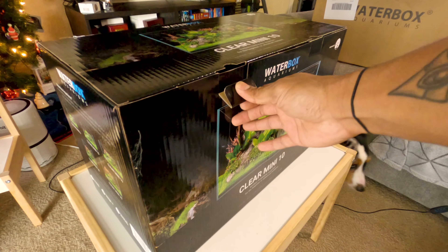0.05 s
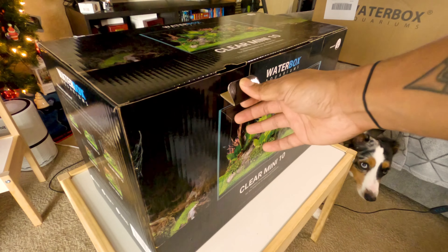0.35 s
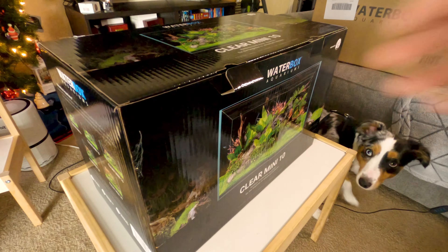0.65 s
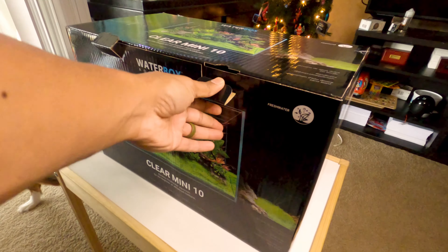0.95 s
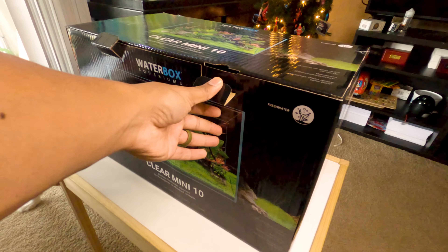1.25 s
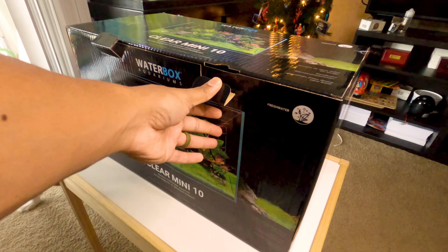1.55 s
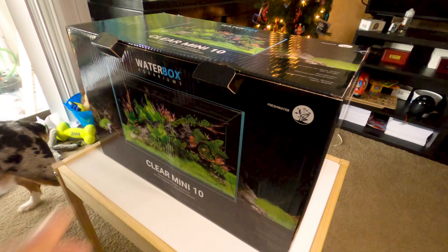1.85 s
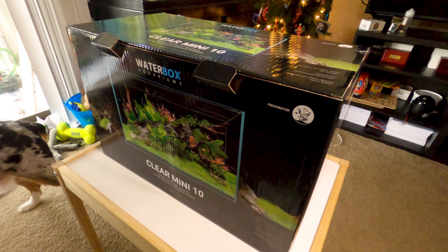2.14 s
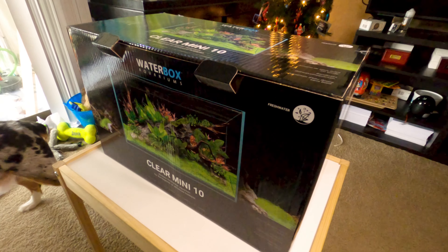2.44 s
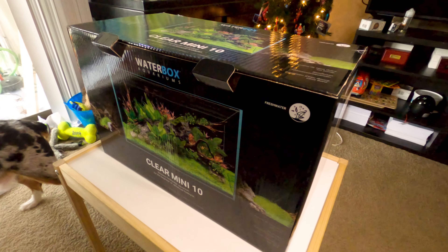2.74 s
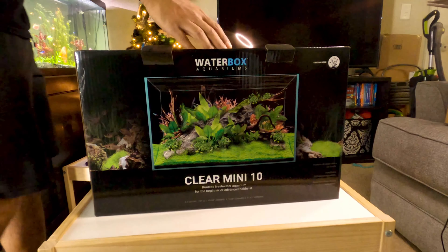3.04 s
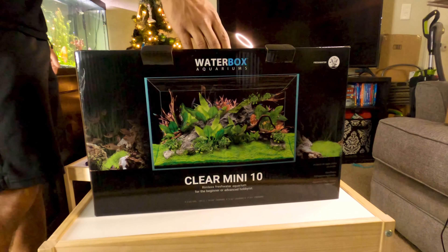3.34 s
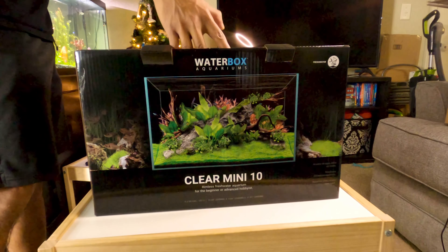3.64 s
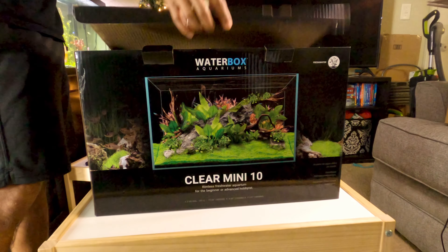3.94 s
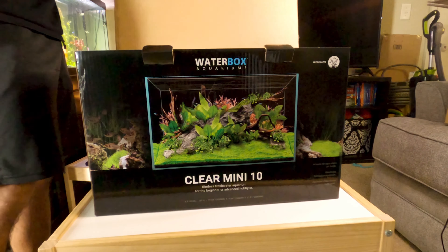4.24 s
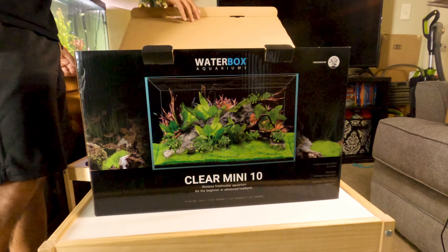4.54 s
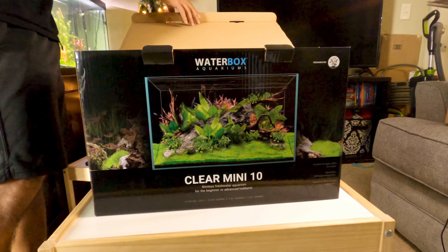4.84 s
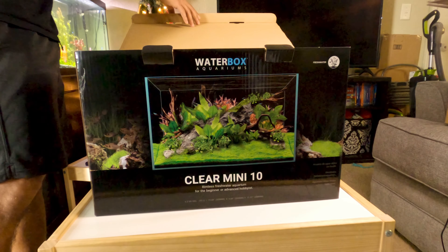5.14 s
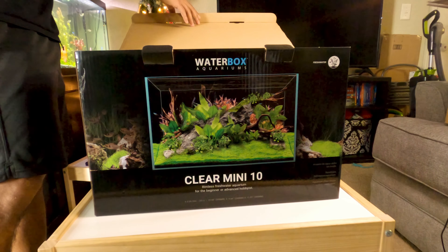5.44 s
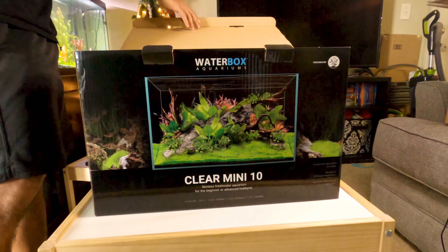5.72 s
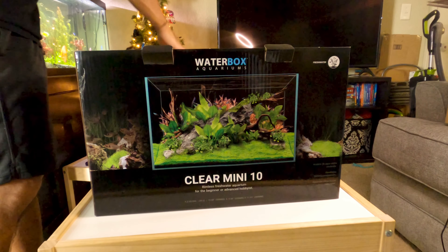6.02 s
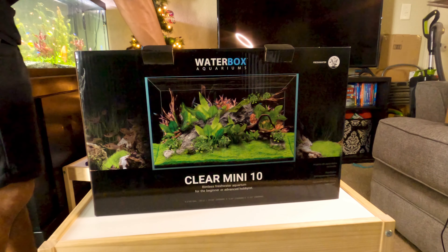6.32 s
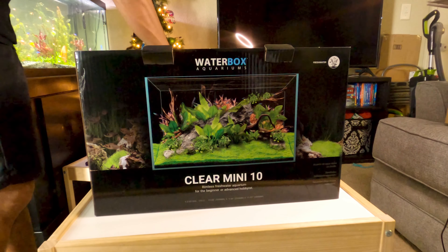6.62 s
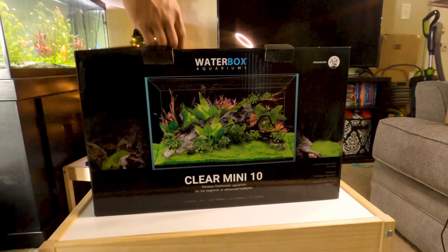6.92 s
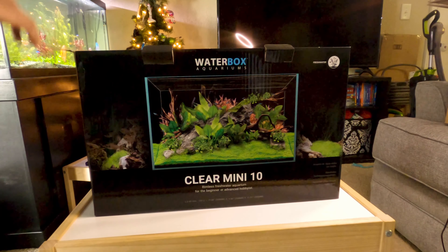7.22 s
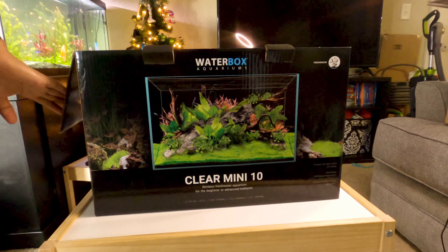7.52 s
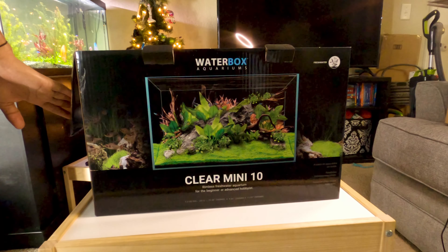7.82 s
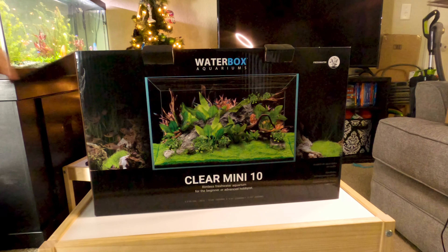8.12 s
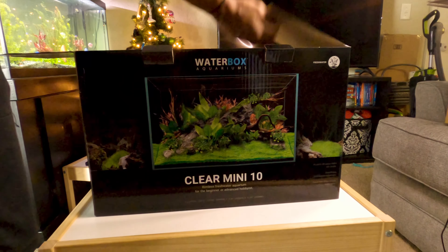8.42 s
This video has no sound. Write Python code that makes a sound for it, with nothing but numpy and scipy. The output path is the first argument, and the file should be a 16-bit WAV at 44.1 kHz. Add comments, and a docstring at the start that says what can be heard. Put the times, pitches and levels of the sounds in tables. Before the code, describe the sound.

A large cardboard box is opened close to the microphone in a room with little echo, over the faint, steady low hum of an aquarium pump and ventilation. It begins with a hollow knock and short scrape, followed by faint ticks and clothing rustle. At about 0.9 seconds a tab drags out with crackling snaps and a loud, boomy knock. Smaller taps come at 1.8 and 2.6 seconds, then another sharp scrape and loud knock at 2.9. Hands brush and tap the board lightly. From 3.8 to 4.4 seconds the lid scrapes free, with a snap and several deep panel thumps, trailing off in soft sliding. Only the hum remains from about 4.8 to 5.9. Clothes then rustle quietly, and from 6.7 to 7.5 flaps brush, click and bump softly. A last rustle and two gentle thumps come around 8.5 seconds.

```python
"""Opening a big cardboard box

A large box is opened close by, on a low table in a carpeted living room. Locking tabs drag out of
their slots and the lid scrapes free, in many tiny slips. Panels knock and boom, creases snap, hands
brush the flaps and clothes rustle. Aquarium equipment and ventilation hum steadily underneath."""
import sys
import numpy as np
from scipy import signal
from scipy.fft import rfft, irfft
from scipy.io import wavfile
from scipy.ndimage import uniform_filter1d

SR = 44100
rng = np.random.default_rng(int(sys.argv[2]) if len(sys.argv) > 2 else 0)


def master(y):
    """Save y as 16-bit WAV."""
    cut = np.clip(np.atleast_2d(y).T, -1, 1)
    pcm = np.round(cut * 32767)  # scale
    wavfile.write(sys.argv[1], SR, pcm.astype(np.int16))


N = 377934
TIME = np.arange(N) / SR

# Levels are set before mixing. A t60 is the time a sound takes to fade by 60 dB.
# A stroke grows by swell_db from start to end; its hiss_db and boom_db are added to its level_db.
# Board dragged hard against board: start_s, length_s, level_db, swell_db, hiss_db, boom_db
DRAGS = [ (0, 0.093, -34, -19.5, -19.5, 3.5), (0.837, 0.025, -47, 3, -6, -0.5),
         (.853, 0.088, -29, 6, -12, -13.5), (0.956, 0.019, -27.5, 8.5, -9.5, 3),
         (1.753, 0.067, -68, 0, 7, 6), (2.898, .035, -40, 0.5, -32, 8.5), (3.772, 0.11, -44.5, 0, -14.5, 6),
         (3.885, 0.014, -33.5, 4, -16, -11.5), (3.903, 0.11, -40.5, 9, -16.5, 11.5),
         (3.981, 0.037, -27, 5, -17, -14), (4.025, 0.027, -24.5, -5, -14.5, 5),
         (4.061, 0.028, -38.5, -10.5, -27, 21.5), (4.102, 0.086, -40.5, 0, -12.5, 10.5),
         (4.201, 0.084, -54, -12, -6.5, 2)]
# Hands and flaps sliding lightly: start_s, length_s, level_db, swell_db, hiss_db
BRUSHES = [ (3.06, 0.036, -51.5, 8, -15), (3.171, 0.17, -53.5, -3, -9), (3.375, .025, -55, -7, -21),
           (3.594, 0.019, -50, 4, -17), (3.614, 0.045, -46, 13, -9), (4.358, .02, -49.5, -4, -15),
           (4.367, 0.11, -52, 8, -13.5), (4.481, 0.078, -57, -5, 0.5), (6.703, 0.028, -53.5, 4, 0),
           (6.712, 0.11, -50.5, 2, 1.5), (7.028, .025, -55.5, -1, -1), (7.086, 0.024, -53.5, 0, 2),
           (7.112, 0.13, -53.5, 2.5, -6.5), (7.255, 0.19, -54.5, -4, -6.5), (7.393, 0.044, -49.5, -2, -18),
           (8.138, 0.083, -57.5, 11, -7.5)]
# Clothes, and feet on carpet: start_s, length_s, level_db, swell_db, hiss_db
RUSTLES = [ (0.08, 0.345, -57, -6, -10), (0.35, 0.59, -57.5, -6, -17.5), (2.032, 0.65, -59, -1, -23),
           (2.538, 0.052, -51.5, 0, -16), (5.88, 0.34, -63.5, -5.5, -7.5), (6.2, 0.4, -66, 2, -10.5),
           (7.485, 0.67, -59.5, -4, -12.5), (8.13, 0.27, -61.5, 8, -12.5), (8.414, 0.13, -49.5, 3, -16)]
# Blows on the box: start_s, level_db, sharpness_hz, boom_db (against the rest of the hit), focus_hz
KNOCKS = [ (.004, -21.5, 1500, 7, 750), (0.029, -25, 4000, 11, 1150), (.586, -47.5, 3000, 0, 444),
          (.947, -17.5, 1500, -10, 1040), (.951, -13.5, 2200, 2, 850), (.970, -27.5, 5950, 20, 1480),
          (.984, -22.5, 5000, 3, 733), (1.01, -29.5, 1110, -2, 759), (1.827, -31.5, 3380, 4.5, 810),
          (2.605, -35.5, 4000, 7, 800), (2.912, -21, 990, -2, 780), (2.926, -20, 2540, -7, 820),
          (2.929, -16.5, 900, 7, 450), (3.093, -46.5, 4020, -25, 800), (3.138, -47, 1780, -14, 845),
          (3.378, -45, 4440, -25, 803), (3.603, -43.5, 4800, -5.5, 990), (3.794, -44.5, 4000, -11, 980),
          (3.829, -33.5, 3370, -9, 436), (3.890, -33, 6040, -6, 730), (3.942, -39.5, 7000, -11, 700),
          (4.01, -42, 1390, 32, 1000), (4.049, -25.5, 1310, -7.5, 800), (4.175, -34, 1200, -2, 448),
          (4.369, -47.5, 2500, -6, 436), (4.473, -49.5, 2500, -11.5, 750), (8.461, -49, 500, -3, 400),
          (8.519, -47.5, 900, -5, 700)]
# Sharp clicks: creases snapping, plus faint ticks where the sound cuts:
# start_s, level_db, pitch_hz, ring_db (against the burst of noise)
CLICKS = [ (0.158, -53.5, 4060, 0), (0.237, -55, 4070, 0), (0.248, -45.5, 4030, 12),
          (0.266, -45.5, 4050, 4), (0.279, -48, 4100, 5), (0.287, -49, 4180, 7), (0.363, -57, 4170, 2),
          (0.375, -54.5, 4470, -5), (.464, -64, 5500, -11), (0.585, -57, 3780, 7), (0.866, -27.5, 2980, 11),
          (0.886, -28, 3450, -6), (0.92, -26, 3050, 12), (.926, -20, 2880, 3), (.984, -31, 9150, -7.5),
          (1.764, -55, 11500, -3), (1.784, -53.5, 11200, -3), (1.827, -46, 2600, 14),
          (2.576, -55.5, 5600, -5), (2.607, -41, 3120, 13), (2.832, -54.5, 1870, -0.5),
          (2.926, -31.5, 2480, 2.5), (4.042, -33, 4700, -16), (4.185, -44, 7100, -4),
          (6.710, -52, 2954, -7), (7.104, -47, 1686, 1.5), (7.113, -48.5, 6000, 18), (7.407, -43, 3060, -3),
          (7.414, -47, 1380, 8.5), (8.376, -62.5, 4000, -14)]
# Narrow-pitched rasps: sliding edges, and one faint, sustained rub near 1.5 kHz:
# start_s, length_s, pitch_hz, width_hz, level_db
RASPS = [(.01, .12, 1208, 130, -47), (0.854, .019, 3100, 900, -40), (.856, .018, 1130, 293, -29.5),
         (0.914, .045, 2950, 700, -29.5), (0.931, 0.017, 1285, 500, -27), (0.857, .13, 1880, 198, -38.5),
         (0.976, .053, 745, 202, -29), (2.2, 0.4, 1523, 129, -67.5), (2.635, .083, 6000, 2000, -73.5),
         (2.910, 0.033, 807, 300, -28.5), (3.198, 0.17, 772, 90, -59.5), (3.63, 0.066, 948, 150, -51),
         (3.993, 0.0564, 1954, 81, -30.5), (4.04, 0.019, 900, 250, -29), (4.223, 0.48, 4000, 1000, -67.5),
         (4.383, 0.1, 1710, 600, -60), (7.086, 0.056, 1595, 600, -52.5)]
# Whole panels flexing: start_s, level_db, pitch_hz, t60_s
THUMPS = [(.953, -15.5, 122.5, .2), (2.928, -17, 316, 0.043), (4.012, -12, 65.3, 0.095),
          (4.047, -14, 71.6, 0.045), (4.068, -16.5, 81.5, 0.12), (4.158, -24.5, 65, 0.11),
          (4.358, -21.5, 45, 0.11), (7.059, -36.5, 199, 0.18), (7.26, -26.5, 32.8, 0.4),
          (8.449, -36, 201, 0.7), (8.511, -28, 209, 0.17)]
# The box's modes, the tones it naturally rings at: pitch_hz, level_db, t60_s
BOX_MODES = [(77.8, -7, 0.23), (114.4, 4.5, 0.05), (199.4, 6.5, 0.037), (392, 0.5, 0.05), (474, 3.5, 0.027),
             (630, -5, 0.04), (783, 3, 0.038), (1029.4, 3, 0.032), (1253, -22, 0.015), (1440, 2.5, 0.024),
             (1880, -15, 0.018), (2210, 4.5, 0.01), (3000, -5, 0.017), (3040, -9, 0.027),
             (3650, -11, 0.015)]

# The tone colour of each kind of noise: frequency_hz, gain_db
DRAG_COLOUR = [(120, -18.5), (250, 4), (350, 1), (560, -0.5), (780, 1.5), (1100, 1), (1400, -3), (2100, -6),
               (3200, -8), (4500, -15.5), (9200, -21.5), (15500, -42.5)]
BRUSH_COLOUR = [(250, -7), (500, 8.5), (850, 2.5), (1400, 8.5), (2100, 3.5), (3600, -1), (5500, -13),
                (9000, -19), (11000, -27.5), (15500, -35.5)]
RUSTLE_COLOUR = [(250, -20), (500, 1.5), (900, 2.5), (1500, 4), (2300, -9), (4000, -17), (8000, -24.5),
                 (15000, -53)]
CRACK_COLOUR = [(150, -23), (400, 2), (1000, -2.5), (3000, -3), (5000, -12), (9000, -12), (15500, -28)]
CLICK_COLOUR = [(500, -12.5), (1400, 1.5), (3500, 13.5), (6000, 10), (9500, 3.5), (15500, -27)]
AIR_COLOUR = [(12, -25.5), (20, 1), (45, -3.5), (76, -8.5), (123, -7.5), (170, -18), (205, -17), (254, -10),
              (307, -19), (434, -29), (599, -32), (871, -38), (1370, -37), (6480, -59.5), (12000, -78),
              (15600, -122), (22000, -120)]
# Motor and mains tones: pitch_hz, level_db, waver_share (0 is steady)
HUM_TONES = [(29, -41.5, 0.24), (119.7, -51, 0.77), (177.4, -61, .5), (194, -64.5, 0.8), (239.3, -59.5, .3),
             (256.9, -47.5, 0), (362.7, -68, 0), (476.5, -74.5, 0.7)]
# How long the room echoes: frequency_hz, t60_s
ROOM_T60 = [(100, 0.23), (400, 0.37), (1000, 0.31), (3000, .29), (8000, 0.31), (15000, 0.29)]
# How much scattered sound differs between left and right: frequency_hz, gain_db
STEREO_WIDTH = [(30, -13.5), (100, -36), (400, -14), (1000, -8), (2500, -5.5), (6000, -1), (15000, -1.5)]
# Moments when the stereo sound narrows, just after the loudest blows: start_s, depth_db, hold_s
NARROWINGS = [(.85, 52, 1.1), (2.85, 68, 0.63), (3.698, 18.5, 0.92)]
# The bass narrows most: frequency_hz, depth_share
NARROW_SHARE = [(300, 1), (700, 0.82), (1600, 0.66), (4000, 0.43), (8000, .27), (13000, .1)]

PANEL_BELOW_HZ = 300  # in modes below this, whole panels and the air inside move


def drags(attack_s=0.0018, release_t60=0.043, boom_t60=0.22):
    """Tabs and lid pull through tight slots: coarse slips that also shake panels and ring the board."""
    force = slips(per_second=2400, spread_db=3.5, patchy_db=1.0, catch_hz=160)
    boom, ring = (signal.fftconvolve(force, response)[:N] for response in box_responses())
    boom = normalise_band(cut(boom, 54, "highpass"), (60, 300))
    boom *= stroke_loudness(DRAGS, attack_s, boom_t60, offset_column=5)
    ring = normalise_band(ring, (350, 4000)) * stroke_loudness(DRAGS, attack_s, release_t60)
    scrape = rub(force, DRAGS, attack_s, release_t60, DRAG_COLOUR, band_hz=(500, 4000), hiss_hz=4830)
    return undb(-2) * scrape + undb(-5) * boom + undb(-12) * ring


def knocks(crack_t60=0.017, focus_db=8, focus_octaves=0.95, give_s=0.00031, onset_s=0.01):
    """A blow crunches the board and favours the modes near its focus; softer contact sounds duller."""
    out = np.zeros(N)
    boom = normalise_onset(box_responses()[0], onset_s)
    t = TIME[:len(boom)]
    hz, mode_db, t60 = np.transpose([mode for mode in BOX_MODES if mode[0] >= PANEL_BELOW_HZ])
    modes = np.sin(2 * np.pi * hz[:, None] * t) * fade(t, 0.99 * t60[:, None])
    for start, db, sharpness_hz, boom_db, focus_hz in KNOCKS:
        nearness = np.exp(-(np.log2(hz / focus_hz) / focus_octaves) ** 2)
        ring = (rng.choice([-1, 1], len(hz)) * undb(mode_db + focus_db * nearness)) @ modes
        crack = colour(rng.standard_normal(len(t)), CRACK_COLOUR) * fade(t, crack_t60)
        hit = normalise_onset(ring, onset_s) + normalise_onset(crack, onset_s)
        hit *= 1 - np.exp(-t / give_s)  # the board gives a little before it answers
        hit = cut(hit, sharpness_hz, "lowpass")
        hit = normalise_onset(hit, onset_s) + undb(boom_db) * boom
        add(out, start, undb(db) * normalise_onset(hit, onset_s))
    return out


def thumps():
    """A large panel swings slowly back and forth, pushing air."""
    out, t = np.zeros(N), TIME[:SR // 2]
    for start, db, hz, t60 in THUMPS:
        add(out, start, undb(db) * np.sin(2 * np.pi * hz * t) * fade(t, t60))
    return out


def rasps(sag_share=0.035):
    """Uneven chatter around one slowly sinking pitch, like that of a sliding edge."""
    out = np.zeros(N)
    for start, length, hz, width_hz, db in RASPS:
        size = max(int(length * SR), SR // 200)
        noise = rng.standard_normal(SR) + 1j * rng.standard_normal(SR)
        chatter = cut(noise, width_hz / 2, "lowpass")[-size:]
        pitch_hz = hz * (1 + sag_share * np.linspace(.5, -.5, size))
        rasp = np.real(chatter * np.exp(2j * np.pi * np.cumsum(pitch_hz) / SR))
        add(out, start, undb(db) * rasp / np.std(rasp) * signal.windows.tukey(size, .5))
    return out


def clicks(t60=0.012, band_ratio=1.145, attack_s=0.00099):
    """A dry burst of noise with a short ring, as when a stiff crease gives way."""
    out, t = np.zeros(N), TIME[:SR // 16]
    for start, db, hz, ring_db in CLICKS:
        noise = rng.standard_normal((2, len(t)))
        burst = colour(noise[0], CLICK_COLOUR) * fade(t, t60)
        ring = cut(noise[1] * fade(t, t60), [hz / band_ratio, hz * band_ratio], "bandpass")
        click = burst / np.std(burst) + undb(ring_db) * ring / np.std(ring)
        click *= 1 - np.exp(-t / attack_s)
        add(out, start, undb(db) * normalise_onset(click, onset_s=0.004))
    return out


def brushes():
    """Skin and loose flaps glide over the board with fine, dense friction."""
    force = slips(per_second=3400, spread_db=1.3, patchy_db=1.8, catch_hz=62)
    return undb(-6) * rub(force, BRUSHES, attack_s=0.004, release_t60=0.25, tone=BRUSH_COLOUR,
                          band_hz=(890, 5000), hiss_hz=5540)


def rustles():
    """Cloth and carpet rub with so many slips that they sound smooth and dull."""
    force = slips(per_second=17000, spread_db=2.5, patchy_db=1.5, catch_hz=76)
    return undb(-5.5) * rub(force, RUSTLES, attack_s=0.018, release_t60=0.19, tone=RUSTLE_COLOUR,
                            band_hz=(875, 3000), hiss_hz=3880)


def pump_and_fan(waver_hz=7, air_db=-64.5, flicker_db=0.4, left_db=0.3):
    """Pump and fan tones waver over a low rush of air, a little to the left."""
    hum = 0
    for hz, db, waver_share in HUM_TONES:
        waver = 1 + waver_share * (wander(waver_hz) + 1j * wander(waver_hz))  # in level and phase
        hum += np.sqrt(2) * undb(db) * np.real(waver * np.exp(2j * np.pi * hz * TIME))
    rushes = (colour(noise, AIR_COLOUR) for noise in rng.standard_normal((2, N)))
    mid, side = (undb(air_db) * normalise_band(rush, (530, 6000)) for rush in rushes)
    air = mid * undb(flicker_db * wander(rate_hz=4.57)) + spread(side)
    return (hum + air) * undb([[left_db], [-left_db]])


def room(x, echo_db, side_db, first_echo_s=0.0039):
    """The direct sound plus a short wash of echoes from the room."""
    t, tails = TIME[:SR // 2], 0
    edges_hz = np.geomspace(40, 18000, 10)
    noise = rng.standard_normal((2, len(t)))
    for low, high in zip(edges_hz, edges_hz[1:]):
        t60 = lookup(np.sqrt(low * high), ROOM_T60)
        tails += cut(noise, [low, high], "bandpass", order=3) * fade(t, t60)
    tails *= t > first_echo_s
    mid, side = (signal.fftconvolve(x, tail / np.linalg.norm(tail))[:N] for tail in tails)
    return x + undb(echo_db) * mid + undb(side_db) * spread(side)


def box_responses():
    """How the box answers one tap: the boom of its panels and the higher, hollow ring of the board."""
    t = TIME[:SR // 4]
    modes = np.array([(-1) ** k * undb(db) * np.sin(2 * np.pi * hz * t) * fade(t, t60)
                      for k, (hz, db, t60) in enumerate(BOX_MODES)])
    is_panel = np.array(BOX_MODES)[:, 0] < PANEL_BELOW_HZ
    return modes[is_panel].sum(0), modes[~is_panel].sum(0)


def slips(per_second, spread_db, patchy_db, catch_hz, crumble_s=0.0027):
    """Friction force: fibres let go in tiny bursts, in spurts as the ridges catch."""
    sizes = undb(spread_db * np.minimum(rng.exponential(size=N), 3))
    lets_go = rng.random(N) < per_second / SR
    decay = np.exp(-1 / (crumble_s * SR))
    energy = signal.lfilter([1], [1, -decay], lets_go * sizes ** 2)
    return np.sqrt(energy) * rng.standard_normal(N) * undb(patchy_db * wander(catch_hz))


def rub(force, strokes, attack_s, release_t60, tone, band_hz, hiss_hz):
    """The rubbing noise of a set of strokes; the fine hiss of the edge has its own level."""
    noise = colour(force, tone)
    body = normalise_band(cut(noise, hiss_hz, "lowpass", order=4), band_hz)
    body *= stroke_loudness(strokes, attack_s, release_t60)
    hiss = cut(noise, hiss_hz, "highpass", order=4)
    return body + hiss / np.std(hiss) * stroke_loudness(strokes, attack_s, release_t60, offset_column=4)


def stroke_loudness(strokes, attack_s, release_t60, offset_column=None):
    """Each stroke takes hold, swells or eases, then dies away; offset_column adds to its level."""
    energy = np.zeros(N)
    for row in strokes:
        start, length, db, swell_db = row[:4]
        offset_db = row[offset_column] if offset_column else 0
        t = TIME[:int((length + release_t60) * SR)]
        slide = undb(db + swell_db * (np.minimum(t / length, 1) - .5) + offset_db)
        attack = np.minimum(t / (attack_s + 0.22 * length), 1)  # longer strokes start more gently
        release = fade(np.maximum(t - length, 0), release_t60)
        add(energy, start, (slide * attack * release) ** 2)
    return np.sqrt(energy)


def spread(side):
    """Widen scattered sound: add it on the left and subtract it on the right."""
    return colour(side, STEREO_WIDTH) * np.array([[1], [-1]])


def undb(db):
    """Turn decibels into a gain."""
    return 10 ** (np.asarray(db) / 20)


def lookup(hz, points):
    """Read between (frequency_hz, value) points on a log-frequency scale."""
    frequencies, values = np.transpose(points)
    return np.interp(np.log(hz + 1), np.log(frequencies), values)


def colour(x, points):
    """Shape the tone of x with (frequency_hz, gain_db) points."""
    hz = np.fft.rfftfreq(len(x), 1 / SR)
    return irfft(rfft(x) * undb(lookup(hz, points)), len(x))


def cut(x, hz, kind, order=2):
    """Keep the lows, the highs or one band of x."""
    return signal.sosfilt(signal.butter(order, np.clip(hz, 10, SR / 2.2), kind, fs=SR, output="sos"), x)


def normalise_band(x, band_hz):
    """Scale x to an average (rms) level of 1 within a band."""
    return x / np.std(cut(x, band_hz, "bandpass", order=4))


def normalise_onset(x, onset_s):
    """Scale a hit to an average (rms) level of 1 over its first moments."""
    return x / np.sqrt(np.mean(x[:int(onset_s * SR)] ** 2))


def wander(rate_hz):
    """A smooth random curve that strays about 1 either side of zero."""
    step = max(int(SR / rate_hz), 2)
    stairs = np.repeat(rng.standard_normal(N // step + 1), step)[:N]
    return 1.3 * uniform_filter1d(uniform_filter1d(stairs, step), step)


def fade(t, t60):
    """Die away by 60 dB every t60 seconds."""
    return np.exp(-np.log(1000) * t / t60)


def add(track, start_s, sound):
    """Mix a sound into the track."""
    i = max(int(start_s * SR), 0)
    track[i:i + len(sound)] += sound[:N - i]


def scene(treble_hz=10500, gap_s=(6.83, 7.02)):
    """Scrapes and drier clicks in front, blows that fill the room, hands and clothes wider behind."""
    scrapes, clicking = drags() + rasps(), clicks()
    treble_filter = signal.butter(2, treble_hz, "highpass", fs=SR, output="sos")
    treble = signal.sosfiltfilt(treble_filter, scrapes + clicking)
    front = room(scrapes, echo_db=-6, side_db=-4) + room(clicking, echo_db=-14.5, side_db=-8)
    front += undb(-4.5) * treble * np.array([[-1], [1]])  # the highest treble favours the right
    blows = room(knocks() + thumps(), echo_db=-7, side_db=-4.5)
    behind = room(brushes() + rustles(), echo_db=-8.5, side_db=0)
    # the brushing and rustling sound cuts off abruptly, echo and all
    behind *= (TIME < gap_s[0]) | (TIME > gap_s[1])
    return front + blows + behind + pump_and_fan()


def record(dry, reopen_db_per_s=97, dropout_s=(2.835, 2.856), edge_s=0.00028, top_hz=15500):
    """The stereo sound narrows and reopens, all drops out for an instant, and the top treble is cut."""
    mid, side = dry.mean(0), (dry[0] - dry[1]) / 2
    hz, t, spectra = signal.stft(side, SR, nperseg=1024)
    depth_db = np.max([(t >= start) * np.clip(db - reopen_db_per_s * (t - start - hold), 0, db)
                       for start, db, hold in NARROWINGS], axis=0)
    spectra *= undb(-np.outer(lookup(hz, NARROW_SHARE), depth_db))
    side = signal.istft(spectra, SR)[1][:N]
    audible = 1.0 * ((TIME < dropout_s[0]) | (TIME > dropout_s[1]))
    stereo = np.array([mid + side, mid - side]) * uniform_filter1d(audible, int(edge_s * SR))
    return signal.sosfilt(signal.ellip(10, .2, 70, top_hz, fs=SR, output="sos"), stereo)


dry = scene()
out = record(dry)
master(out)
```